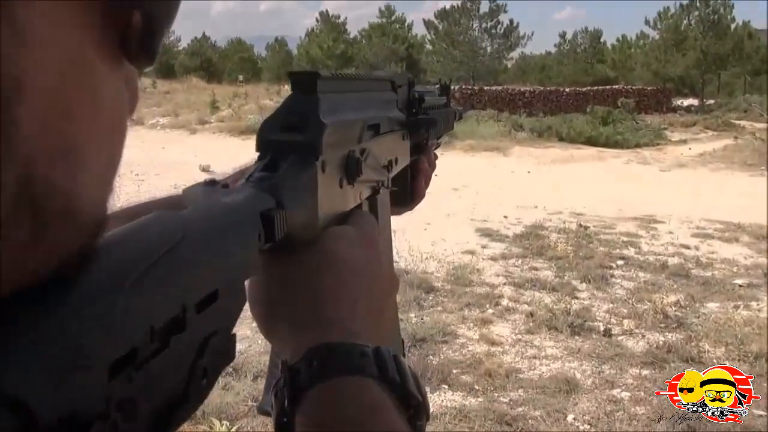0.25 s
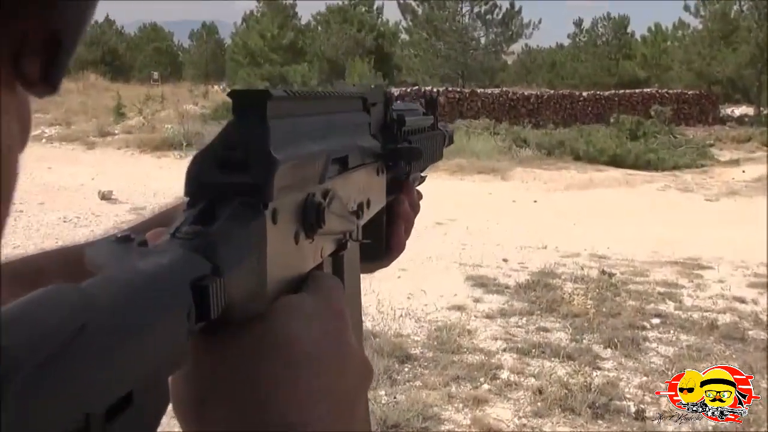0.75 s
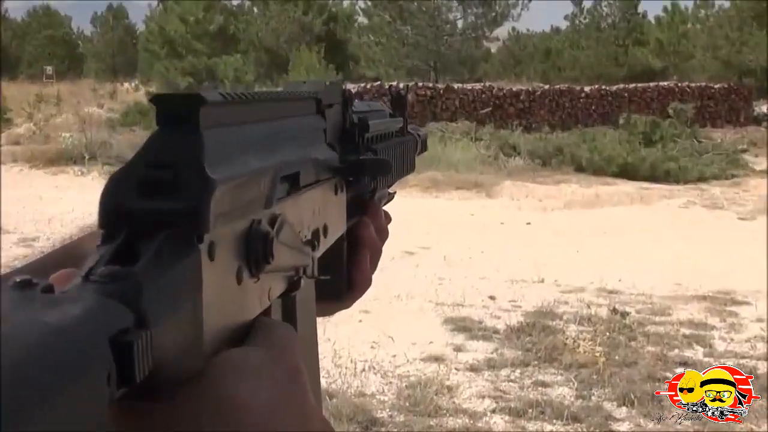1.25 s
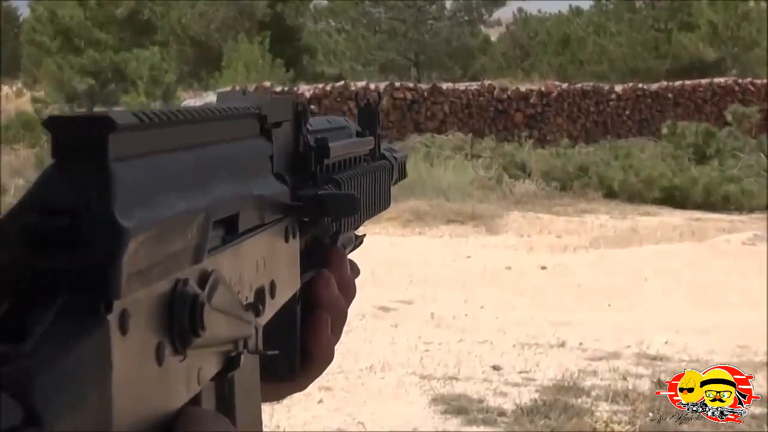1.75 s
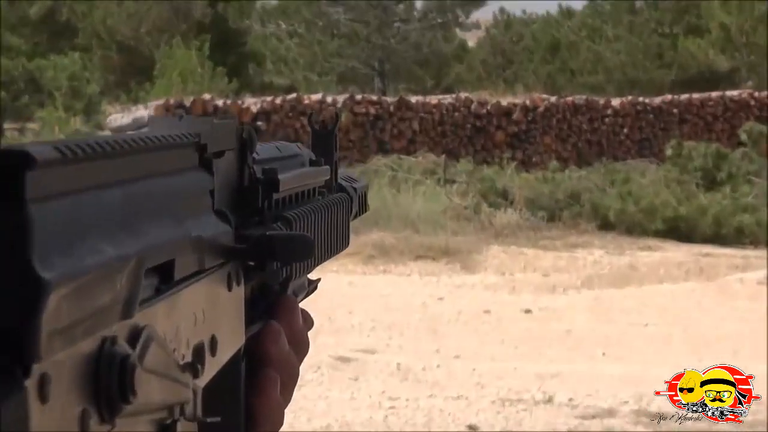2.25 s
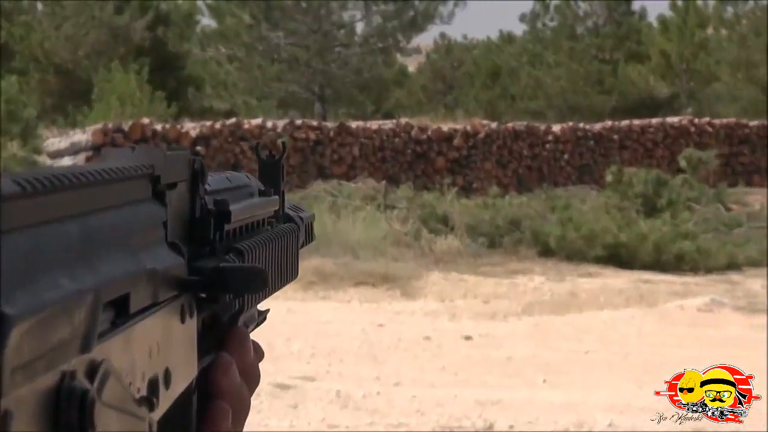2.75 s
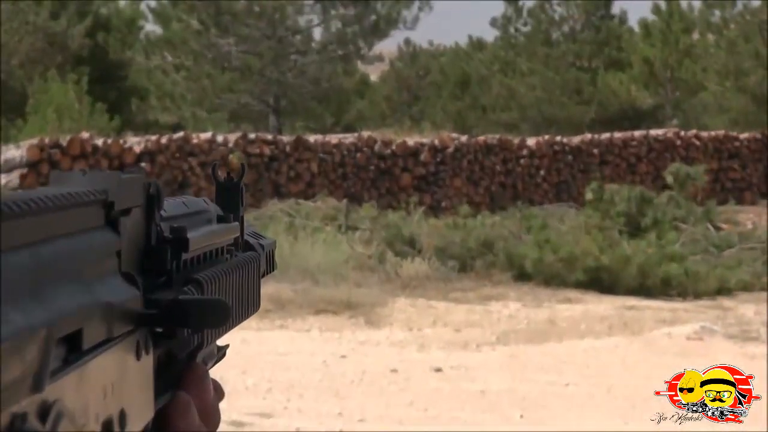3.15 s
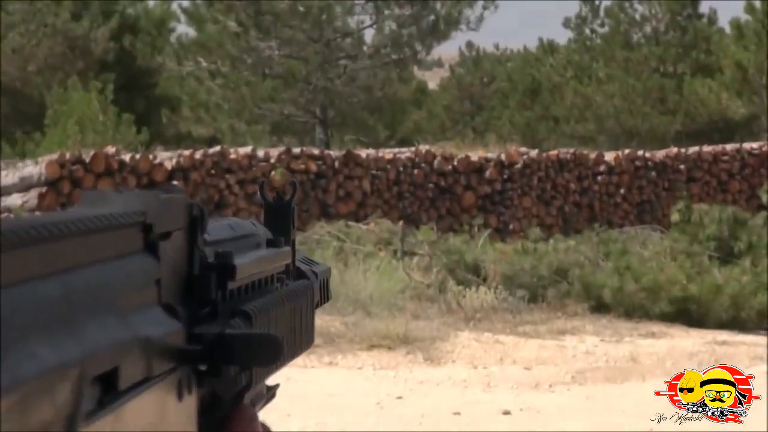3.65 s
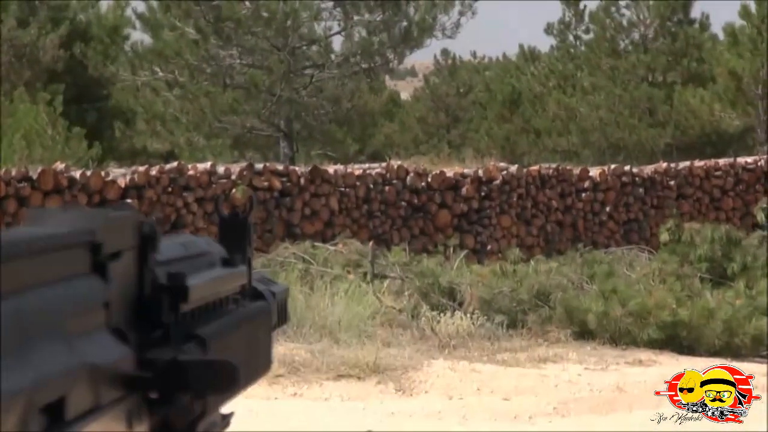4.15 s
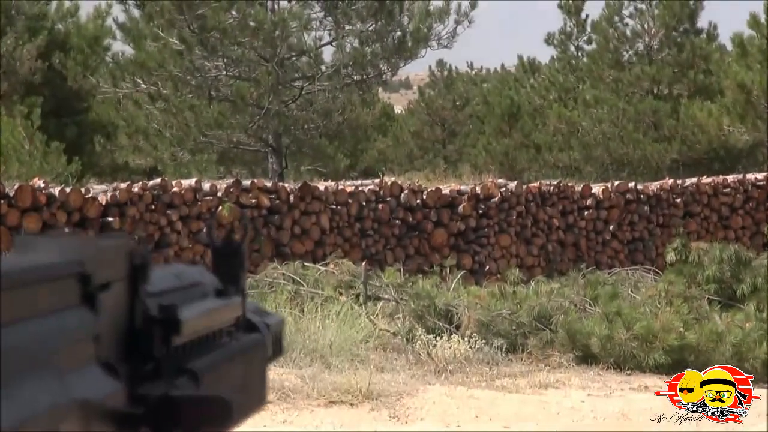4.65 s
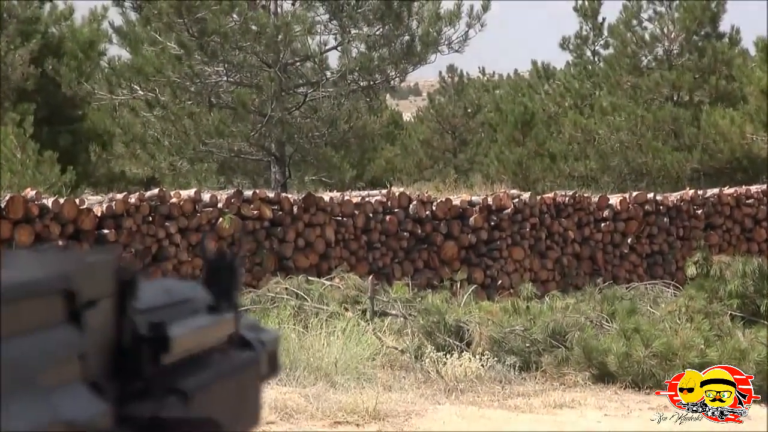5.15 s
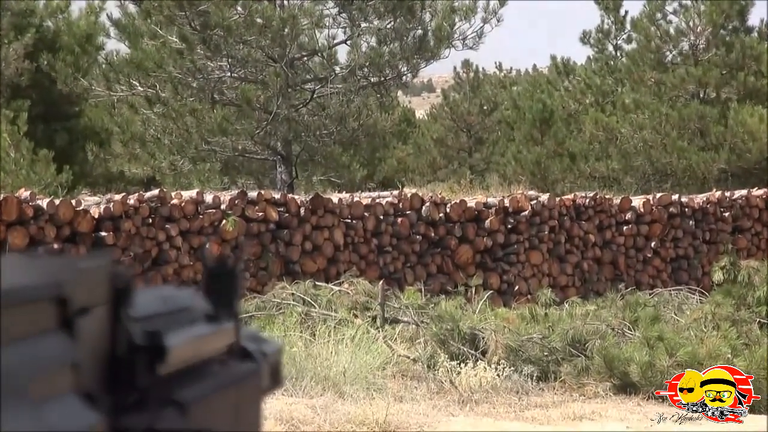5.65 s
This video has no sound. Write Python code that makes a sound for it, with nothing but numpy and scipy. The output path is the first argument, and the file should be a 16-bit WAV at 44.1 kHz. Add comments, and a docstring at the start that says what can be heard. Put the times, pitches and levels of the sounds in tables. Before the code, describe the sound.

A quiet open range with soft wind, low distant rumble and thin hiss. At 0.2 s a small trigger click, then an electric airsoft rifle fires seven single shots, starting near 0.47, 1.26, 2.13, 2.98, 3.82, 4.59 and 5.38 s. Each lasts under a quarter second: a gritty gear buzz whirs upward with small knocks, the piston lands with a short air pop and low thump, and the gears wind down. About 0.16 s after the start the bolt slams with a hard, short metallic clack and two quick weaker bounces, then a light rattle. A sharp trigger click follows roughly 0.45 s after each start, strongest near 2.57 s, with faint ticks between. The first shot has a weaker thump. A barely audible wavering far hum drifts in, mainly around 4 s and at the end. The gun is close, dry and nearly central, with only a faint late answer from trees.

```python
"""Wind and far rumble, a trigger click, then seven single shots of an electric airsoft rifle on a dry range.
Each shot: gear teeth whir up and draw the piston, air pops, the gears run down, the bolt slams and bounces.
Gears and knocks are pulses and noise through the receiver's resonances; struck metal adds decaying sines.
The trigger clicks after each shot too. Shaped noise makes the wind, the hiss and the trees' faint answer."""
import sys
import numpy as np
from scipy import signal
from scipy.fft import rfft, irfft, next_fast_len
from scipy.io import wavfile
from scipy.ndimage import uniform_filter1d, map_coordinates

SR = 44100
rng = np.random.default_rng(int(sys.argv[2]) if len(sys.argv) > 2 else 0)


def unload_audio(sound):
    """Save the sound as a 16-bit wav file, at the path given as the first command line argument."""
    columns = np.transpose(np.atleast_2d(sound))
    # keep every value between -1 and 1, then stretch to whole-number steps
    steps = np.round(np.clip(columns, -1, 1) * 32767)
    wavfile.write(sys.argv[1], SR, steps.astype(np.int16))


N = 260158

# Each row: motor start in seconds, gear level in dB, wind-down against wind-up in dB, tooth rate factor,
# whine against load in dB, thump in dB, pop against gears in dB, piston landing level in dB.
SHOTS = [(.470, -24.5, 0.5, 1.01, -6, -5.5, -3, -19), (1.264, -26, 2.5, 1.02, -4, 1.5, -1, -14.5),
         (2.130, -25.5, 1, 1.004, -7.5, 4.5, 3, -12.5), (2.975, -25.5, 2, 0.99, -3.5, 4, 2.5, -14.5),
         (3.818, -24.5, 0.5, 1.01, -6, 1.5, -1, -11.5), (4.594, -26, 1, 0.96, -5, 4, 3.5, -14.5),
         (5.378, -26, 2, .98, -3.5, 3.5, 3, -13.5)]
# Knocks tied to the gear cycle: clutch, rack caught, rack caught again. Each row: seconds after the start,
# level over the gears in dB, bass in dB, treble in dB, t60 in seconds, ring in dB.
STROKES = [(-.0013, -0.5, -8.5, -10, 0.034, -7), (0.0151, 3.5, -17.5, -13.5, .035, -14.5),
           (.0933, 6, -18.5, -19, 0.041, -15.5)]


def amp(db):
    """Amplitude ratio from dB."""
    return 10 ** (np.asarray(db) / 20)


def unit(x):
    """x scaled to RMS 1."""
    return x / np.sqrt(np.mean(x ** 2) + 1e-20)


def along(points, hz):
    """(Hz, value) points interpolated on a log frequency axis."""
    point_hz, values = np.transpose(points)
    return np.interp(np.log(hz + 1), np.log(point_hz + 1), values)


def wobble(rate_hz):
    """A smooth random curve with rate_hz knots a second."""
    knots = rng.standard_normal(int(N * rate_hz / SR) + 4)
    return map_coordinates(knots, [np.arange(N) * rate_hz / SR])


def smoothed(x, width, axis):
    """Moving average along one axis."""
    return uniform_filter1d(x, width, axis)


def filtered(x, response):
    """x times a response of frequency, in the spectrum."""
    size = next_fast_len(N + SR // 2)
    spectrum = rfft(x, size) * response(np.fft.rfftfreq(size, 1 / SR))
    return irfft(spectrum, size)[..., :N]


def causal(gain, size=4096):
    """Minimum-phase impulse response of a gain curve, energy 1, by folding the cepstrum."""
    cepstrum = irfft(np.log(gain(np.fft.rfftfreq(size, 1 / SR)) + 1e-6))
    cepstrum[1:size // 2] *= 2
    cepstrum[size // 2 + 1:] = 0
    impulse = irfft(np.exp(rfft(cepstrum)))[:size // 2]
    return impulse / np.linalg.norm(impulse)


def ringing(x, gain):
    """x through a causal filter of that gain shape."""
    return signal.fftconvolve(x, causal(gain))[:N]


def below(hz, edge_hz):
    """Smooth low-pass gain."""
    return 1 / (1 + (hz / edge_hz) ** 8)


def rush(spectrum, patchy_db):
    """Shaped mid and side noise of joint RMS 1, with time-frequency patches of random gain."""
    # Each row: frequency in Hz, side against mid in dB.
    side_curve = [(30, -27.5), (60, -27.5), (150, -20.5), (700, -18), (2400, -18.5), (4400, -13),
                  (8000, -0.5), (10800, -3), (11400, -17.5), (16000, -23.5)]
    z = signal.stft(rng.standard_normal((2, N)), nperseg=512)[2]
    patches = smoothed(smoothed(rng.standard_normal(z.shape[1:]), 6, 0), 14, 1)
    pair = signal.istft(z * amp(patchy_db * unit(patches)), nperseg=512)[1][:, :N]
    return unit(filtered(pair, lambda hz: amp(along(spectrum, hz)) * amp([0 * hz, along(side_curve, hz)])))


def air():
    """Far rumble, wind in the pines and the camera's hiss: three noises, the first two of drifting level."""
    # Each row: time in seconds, rumble level in dB, wind level in dB.
    drift = [(0.0, -71, -59.5), (0.54, -75.5, -59), (0.72, -76.5, -67), (1.23, -78, -64.5),
             (1.5, -68.5, -66), (2.74, -69.5, -65), (3.79, -66.5, -58.5), (4.19, -71.5, -61),
             (4.67, -64, -60.5), (5.08, -67, -61), (5.31, -63.5, -58), (5.9, -70, -59.5)]
    # Noise spectra. Each row: frequency in Hz, relative density in dB per Hz.
    rumble_spectrum = [(12, -50), (20, -20), (72, 0), (162, -1.5), (264, -8.5), (289, -21), (400, -19),
                       (520, -43.5), (880, -120)]
    wind_spectrum = [(150, -31), (250, -10), (434, -10), (509, -10), (623, -5.5), (798, -9.5), (1150, -4.5),
                     (1470, -9.5), (1800, -14.5), (1930, -18), (8000, -49), (10400, -86.5), (17600, -120)]
    hiss_spectrum = [(3000, -34), (5000, -5), (6500, -9.5), (9500, -10.5), (11100, -11.5), (11500, -3.5),
                     (14600, -2.5), (15600, -6), (16000, -25.5), (17000, -59.5)]
    hiss_db = -86.5
    knot_s, *columns = np.transpose(drift)
    t = np.arange(N) / SR
    rumble_db, wind_db = [np.interp(t, knot_s, column) for column in columns]
    rumble = amp(rumble_db + 1.1 * wobble(12)) * rush(rumble_spectrum, patchy_db=2.0)
    wind = amp(wind_db + 0.63 * wobble(4)) * rush(wind_spectrum, patchy_db=1.5)
    return rumble + wind + amp(hiss_db) * rush(hiss_spectrum, patchy_db=1.0)


def hum():
    """A far wavering hum: sine lines of randomly drifting level and phase."""
    # Each row: time in seconds, relative level in dB.
    swell = [(0.0, -69), (1.03, -81.5), (1.46, -67.5), (1.74, -70), (3.57, -71), (3.98, -57.5),
             (5.13, -68.5), (5.59, -60.5), (5.9, -58)]
    # Each row: frequency in Hz, relative level in dB.
    hum_lines = [(719, 1.5), (353.5, -3), (1170, -6.5)]
    t = np.arange(N) / SR
    lines = sum(amp(db + 2.9 * wobble(12)) * np.sin(2 * np.pi * hz * t + 1.8 * wobble(30))
                for hz, db in hum_lines)
    return amp(np.interp(t, *np.transpose(swell)) - 3.5) * lines


def trills():
    """Thin rough trills: sines of fast random level and phase, each for a moment."""
    # Each row: start in seconds, end in seconds, frequency in Hz, level in dB.
    trill_rows = [(3.67, 3.8, 5150, -79), (3.66, 3.72, 2200, -74)]
    t = np.arange(N) / SR
    out = np.zeros(N)
    for start_s, end_s, hz, db in trill_rows:
        tone = np.sin(2 * np.pi * hz * t + 1.3 * wobble(480))
        out += amp(db + 2.4 * wobble(120)) * tone * (t > start_s) * (t < end_s)
    return out


def trees(x):
    """The range answers late, in uneven patches: x through decaying noise, each frequency at its own rate."""
    # Each row: frequency in Hz, echo colour in dB.
    leaf_colour = [(300, -25), (1500, -9), (2500, -7.5), (3400, -2), (4300, -8), (5500, -1.5), (8000, -6.5),
                   (16000, -29.5)]
    # Each row: frequency in Hz, t60 in seconds.
    leaf_t60 = [(500, .3), (3300, 0.73), (6000, 0.27), (16000, .15)]
    hz, t, z = signal.stft(rng.standard_normal(SR // 2), SR, nperseg=256)
    patches = smoothed(smoothed(rng.standard_normal(z.shape), 3, 0), 6, 1)
    decay_db = -60 * t / along(leaf_t60, hz)[:, None]
    z = z * amp(along(leaf_colour, hz)[:, None] + 1.9 * unit(patches) + decay_db)
    tail = signal.istft(z, SR, nperseg=256)[1]
    late = np.pad(x, (1500, 0))  # samples
    return signal.fftconvolve(late, tail / np.linalg.norm(tail))[:N]


def burst(t60_s, spike_db, rise_s):
    """Decaying noise with one sharp spike just after its start."""
    t = np.arange(SR // 8) / SR
    x = rng.standard_normal(len(t)) * amp(-60 * t / np.clip(t60_s, .005, .2)) * (1 - np.exp(-t / rise_s))
    x[30] += amp(spike_db)
    return x


def clicks():
    """Trigger clicks and faint ticks: a sharp snap, a short fizz, and the ring of small steel parts."""
    # Trigger clicks, one before the first shot and the rest after shots. Each row: start in seconds,
    # level in dB, treble in dB, t60 in seconds.
    trigger = [(0.2091, -39.5, -36.5, .05), (0.9065, -28, -22.5, .082), (1.7009, -31.5, -15, 0.036),
               (1.7098, -41, -19, 0.1), (2.5698, -17.5, -32, .058), (3.4093, -31.5, -9, 0.057),
               (4.2568, -29.5, -21.5, .059), (5.029, -26.5, -18, 0.065), (5.8191, -26.5, -22, .05)]
    # Faint ticks. Each row: start in seconds, level in dB.
    ticks = [(.17, -55.5), (0.234, -54), (.794, -53.5), (1.0913, -53.5), (1.954, -55.5), (2.6932, -54),
             (2.791, -54), (3.6303, -52.5), (3.6611, -52), (4.1405, -56), (4.458, -59), (5.2779, -51),
             (5.7014, -56)]
    # Ring of the trigger parts. Each row: frequency in Hz, level in dB, longest t60 in seconds.
    sear_modes = [(1970, -10, 0.018), (2670, 4.5, 0.038), (3190, -5, 0.016), (4860, -3, .025),
                  (5880, -4, 0.023)]
    # Snap colour. Each row: frequency in Hz, relative density in dB per Hz.
    snap_colour = [(530, -39.5), (900, -27.5), (1540, -6), (2790, 2.5), (3880, -0.5), (4650, -3),
                   (6230, -6.5), (8550, -28.5), (14800, -22), (16500, -43.5)]
    tick_treble_db, tick_t60_s = -31, .05
    snap_over_fizz_db, mode_scatter_db = 27, 3.5
    out, ring, t = np.zeros((2, N + SR)), np.zeros(N + SR), np.arange(SR // 10) / SR
    for start_s, db, treble_db, t60_s in trigger + [(s, db, tick_treble_db, tick_t60_s) for s, db in ticks]:
        low = burst(t60_s, snap_over_fizz_db, 0.0012)
        high = amp(treble_db + 14.0) * burst(t60_s, 6.6, 0.00093)
        i = round(start_s * SR)
        out[:, i:i + len(low)] += amp(db - 20.5) * np.array([low, high])
        for hz, mode_db, life_s in sear_modes:
            life_s = min(life_s, t60_s * .4)  # the ring dies before the fizz
            mode = np.sin(2 * np.pi * hz * rng.normal(1, 0.082) * t)
            level_db = db - 20 + mode_db + rng.normal(0, mode_scatter_db)
            ring[i + 30:i + 30 + len(t)] += amp(level_db - 60 * t / life_s) * mode  # from the spike on

    def colour(hz):
        return amp(along(snap_colour, hz))

    return (ringing(out[0], lambda hz: colour(hz) * below(hz, 8900))
            + ringing(out[1], lambda hz: colour(hz) * (1 - below(hz, 7100))) + ring[:N])


def receiver(hz):
    """Gain of the gun body: a broad colour with resonances on top."""
    # Each row: frequency in Hz, relative density in dB per Hz.
    broad = [(60, -53), (300, -25), (450, -11.5), (700, -6.5), (1600, -2), (3400, -5), (6300, -11),
             (7300, -16.5), (9500, -19.5), (11000, -18), (11600, -10.5), (14200, -9), (15700, -18.5),
             (16200, -44.5), (16800, -57)]
    # Each row: centre in Hz, width in Hz, height in dB.
    resonances = [(571.4, 97, 8.5), (920, 290, 6.5), (1400, 140, -5.5), (2720, 220, 3.5), (3830, 780, 5.5),
                  (4770, 210, 2.5), (6100, 460, -1.5), (12240, 1400, 6.5)]
    peaks_db = sum(db / (1 + (2 * (hz - centre_hz) / width_hz) ** 2) for centre_hz, width_hz, db in resonances)
    return amp(along(broad, hz) + peaks_db)


def in_three_bands(bass, middle, treble):
    """Each excitation sounds through its own part of the receiver's response."""
    return (ringing(bass, lambda hz: receiver(hz) * below(hz, 800))
            + ringing(middle, lambda hz: receiver(hz) * (1 - below(hz, 730)) * below(hz, 8500))
            + ringing(treble, lambda hz: receiver(hz) * (1 - below(hz, 8500))))


def blows():
    """Every knock in the receiver: start in s, level dB, bass dB, treble dB, t60 in s, ring dB."""
    # The bolt slams home and bounces twice. Each row: slam in seconds, level in dB, first flight in seconds,
    # bounce level in dB, second flight in seconds, bounce level in dB.
    slams = [(.633, -14.5, .0243, -18.5, .0137, -26.5), (1.4273, -16, .0221, -15.5, 0.015, -29),
             (2.291, -14.5, .0234, -19, .0122, -26.5), (3.1335, -17.5, .0216, -18.5, 0.014, -26.5),
             (3.9761, -16, .0206, -19, 0.014, -31.5), (4.751, -17, .0185, -19.5, .0119, -31),
             (5.5353, -15, .0195, -20, .012, -37)]
    # Slam and its two bounces. Each row: bass in dB, treble in dB, t60 in seconds, ring in dB.
    bolt_voices = [(-14.5, -13.5, 0.038, -11.5), (-13.5, -13.5, 0.039, -14.5), (-16.5, -10.5, .042, -21)]
    # A loose part rattles last. Each row: start in seconds, level in dB, treble in dB.
    rattles = [(0.6917, -33, -3.5), (0.6963, -32.5, 0), (.7124, -46, -14), (1.4958, -30, -5),
               (2.3421, -30.5, -5), (3.1907, -30.5, -1.5), (4.0454, -30.5, -1.5), (4.8283, -28, -5),
               (5.584, -27.5, -17)]
    # Piston landing: bass in dB, treble in dB, t60 in seconds, ring in dB.
    landing_voice = (-24, -14, 0.03, -19.5)
    landing_s = .0635  # after the start
    rattle_bass_db, rattle_t60_s, rattle_ring_db = -32, 0.039, -34
    rows = [(shot[0] + after_s, shot[1] + db, *voice) for shot in SHOTS for after_s, db, *voice in STROKES]
    rows += [(shot[0] + landing_s, shot[-1], *landing_voice) for shot in SHOTS]
    for start_s, db, first_s, first_db, second_s, second_db in slams:
        times_s = [start_s, start_s + first_s, start_s + first_s + second_s]
        hits = zip(times_s, [db, first_db, second_db], bolt_voices)
        rows += [(at_s, hit_db, *voice) for at_s, hit_db, voice in hits]
    rows += [(s, db, rattle_bass_db, treble_db, rattle_t60_s, rattle_ring_db) for s, db, treble_db in rattles]
    return rows


def knocks():
    """Piston, bolt and loose parts hit the receiver: spiked noise, and modes of new strength each time."""
    # Ring of the struck receiver. Each row: frequency in Hz, level in dB, longest t60 in seconds.
    metal_modes = [(568, -2, 0.076), (1020, -6, 0.018), (1446, 4.5, 0.02), (2287, -6, 0.0092),
                   (2587, 3.5, 0.027), (3300, -6.5, 0.02), (3680, -10.5, 0.065), (4600, -18, 0.018),
                   (6100, -18, .02)]
    ring_rise_s = .0006
    out, ring, t = np.zeros((3, N + SR)), np.zeros(N + SR), np.arange(SR // 10) / SR
    for start_s, db, bass_db, treble_db, t60_s, ring_db in blows():
        rise_s = np.interp(db, [-33, -28], [.003, .0009])  # faint knocks start softly, loud ones sharply
        bass = amp(bass_db + 6.5) * burst(1.23 * t60_s, 6.3, rise_s)
        middle = burst(t60_s, 12 - 1500 * rise_s, rise_s)
        treble = amp(treble_db + 5.0) * burst(0.71 * t60_s, 3 - 1500 * rise_s, 2.7 * rise_s)
        i = round(start_s * SR)
        out[:, i:i + len(bass)] += amp(db - 6.5) * np.array([bass, middle, treble])
        for hz, mode_db, life_s in metal_modes:
            life_s = min(life_s, t60_s * 1.3)  # hands damp the ring
            low_db = (bass_db + 13.0) * (hz < 800)
            mode = np.sin(2 * np.pi * hz * rng.normal(1, 0.038) * t) * (1 - np.exp(-t / ring_rise_s))
            level_db = db + ring_db + mode_db + low_db + rng.normal(0, 1.5)
            ring[i:i + len(t)] += amp(level_db - 60 * t / life_s) * mode
    return in_three_bands(*out[:, :N]) + ring[:N]


def gears():
    """Uneven tooth strikes at the tooth rate over sliding noise and a whine; one air pop and thumps a shot."""
    # One gear cycle. Each row: seconds after the start, tooth rate in Hz at factor 1, load in dB.
    cycle = [(0, 698, -20), (.011, 893.3, -10), (.017, 999.6, -4), (.03, 1478, -2), (.045, 1676, 0.5),
             (.058, 1795, -0.5), (.062, 1790, -9), (.068, 1800, -12), (.078, 1771, -13), (.096, 1630, -7),
             (.12, 897, -9.5), (.13, 657, -12.5), (0.14, 596, -22.5), (.15, 549, -29.5), (.162, 514, -21),
             (0.171, 448, -57.5)]
    # Piston and recoil push the stock. Each row: seconds after the start, frequency in Hz,
    # level against the gears in dB, t60 in seconds.
    thumps = [(.058, 149.4, -20, 0.04), (.079, 171.2, -17.5, 0.044), (.082, 330, -16, .04)]
    # Strikes emerge from the sliding between these two tooth rates in Hz.
    slur_hz = (600, 1100)
    pop_s = .0715  # air leaves the muzzle, after the start
    clean_full, clean_per_db = 0.79, 0.08  # share of distinct strikes at 0 dB load, change per dB of load
    knee_db = -10.5  # under this load the teeth barely mesh: whine and treble fall away
    whine_falls, treble_falls = 3.1, 0.74  # dB per dB under the knee
    bass_db, full_treble_db = -9.5, -8.5
    idle_treble_db = -8  # until the rack is caught
    treble_teeth = .3  # part of the strike share that reaches the treble

    out, direct = np.zeros((3, N + SR)), np.zeros(N + SR)
    knot_s, *columns = np.transpose(cycle)
    t = np.arange(SR // 5) / SR
    hz, load_db = [np.interp(t, knot_s, column) for column in columns]
    clean = np.clip(clean_full + clean_per_db * load_db, 0, 1) * np.interp(hz, slur_hz, [0, 1])
    shares = clean * np.array([[1], [1], [treble_teeth]])
    idle_db = idle_treble_db * (t < STROKES[1][0])
    slack_db = np.clip(load_db - knee_db, -8, 0)
    treble_db = full_treble_db + treble_falls * slack_db + idle_db
    band_gain = amp([bass_db + 0 * t, 0 * t, treble_db])
    for start_s, db, down_db, speed, whine_db, thump_db, pop_db, _ in SHOTS:
        turns = np.cumsum(hz * speed) / SR  # teeth passed
        draw = rng.standard_normal((len(t), 6))
        count = np.arange(1, int(turns[-1]))
        at = np.interp(count + 0.093 * draw[count, 0], turns, np.arange(len(t))).astype(int)
        teeth = np.zeros(len(t))
        # sqrt keeps the strikes' power even as the rate varies
        teeth[at] = amp(2.3 * np.clip(draw[count, 1], -2, 2)) * np.sqrt(SR / hz[at]) * 0.85
        slow = unit(smoothed(smoothed(draw[:, 3:], 70, 0), 70, 0))
        sliding = amp(2.2 * slow[:, 0]) * draw[:, 2]  # grips and slips
        level = amp(db + load_db + down_db * (t > pop_s))
        drive = level * (np.sqrt(shares) * teeth + np.sqrt(1 - shares) * sliding)
        phase = 2 * np.pi * turns + 1.0 * slow[:, 1]
        waver = amp(3.5 * slow[:, 2])
        tone = np.sin(phase) + amp(-10) * np.sin(2 * phase)
        whine = level * amp(whine_db + whine_falls * slack_db) * waver * tone
        i = round(start_s * SR)
        out[:, i:i + len(t)] += drive * band_gain
        out[:, i + round(pop_s * SR)] += amp(db + pop_db) * amp([8, 17.5, 5])  # pop: bass, middle, treble
        direct[i:i + len(t)] += whine
        for delay_s, push_hz, push_db, t60_s in thumps:
            push = amp(db + push_db + thump_db - 60 * t / t60_s) * np.sin(2 * np.pi * push_hz * t)
            direct[i + round(delay_s * SR):][:len(t)] += push * (1 - np.exp(-t / 0.0013))
    return in_three_bands(*out[:, :N]) + direct[:N]


def scene():
    """Gun, echo, trills and hum get a diffuse side signal; air joins; mid and side become stereo."""
    # Each row: frequency in Hz, side against mid in dB.
    side_curve = [(60, -32), (200, -27.5), (700, -31), (1300, -26), (2400, -18.5), (4400, -16.5),
                  (8000, -2), (10800, 0.5), (11400, -26), (16000, -31)]
    # Each row: frequency in Hz, left minus right in dB.
    lean = [(60, 0), (110, 1), (200, 2), (380, 1.0), (700, 0.5), (1290, 0.5), (2380, 1.5), (4400, 0),
            (8120, 2), (15000, -0.5)]
    gun = gears() + knocks() + clicks()
    gun = gun + amp(-33.5) * trees(gun) + trills() + hum()
    # random phases in each short frame make a diffuse side signal
    z = signal.stft(gun, nperseg=128)[2]
    diffuse = signal.istft(z * np.exp(2j * np.pi * rng.random(z.shape)), nperseg=128)[1][:N]
    side = amp(0.5) * filtered(diffuse, lambda hz: amp(along(side_curve, hz)))
    mid, side = np.array([gun, side]) + air()
    stereo = np.array([mid + side, mid - side])
    return filtered(stereo, lambda hz: amp(np.outer([.5, -.5], along(lean, hz))))


def record(dry):
    """The camera keeps nothing above its band limit: a sharp cut in the spectrum."""
    top_hz = 16800
    return filtered(dry, lambda hz: hz < top_hz)


dry = scene()
out = record(dry)
unload_audio(out)
```